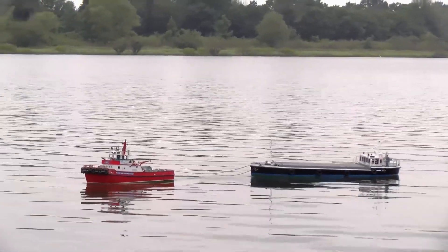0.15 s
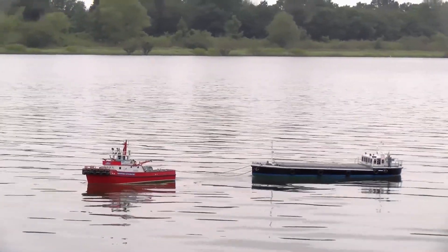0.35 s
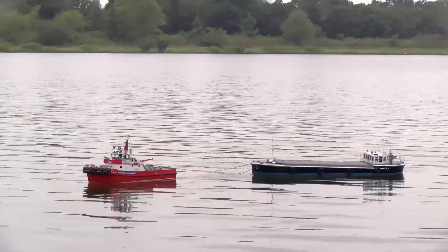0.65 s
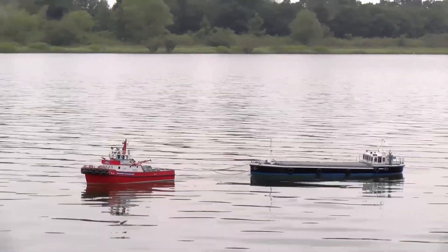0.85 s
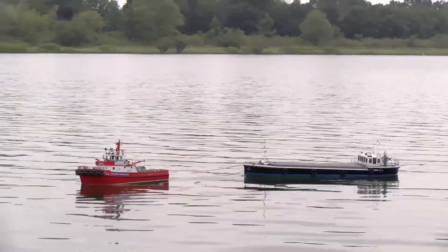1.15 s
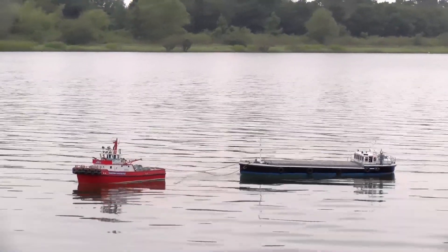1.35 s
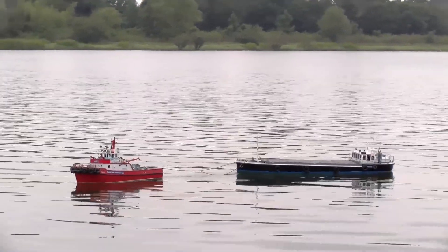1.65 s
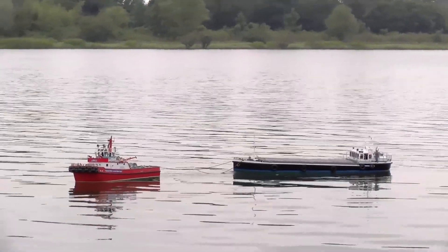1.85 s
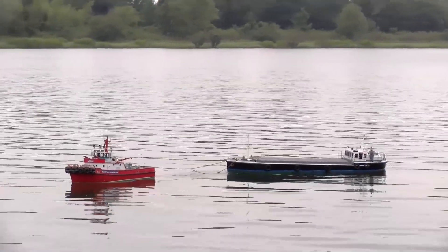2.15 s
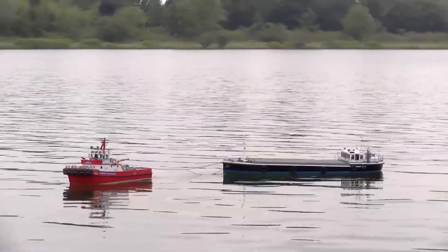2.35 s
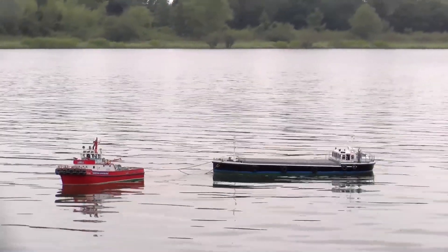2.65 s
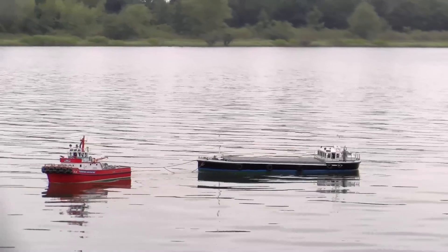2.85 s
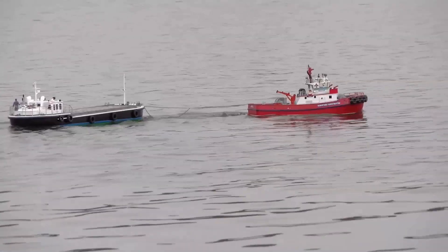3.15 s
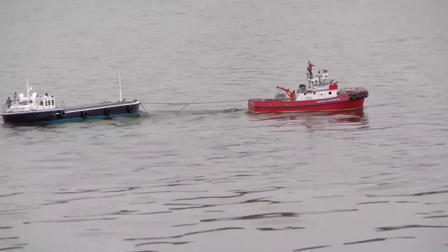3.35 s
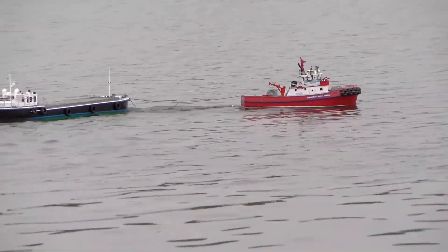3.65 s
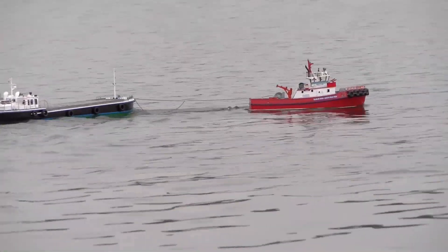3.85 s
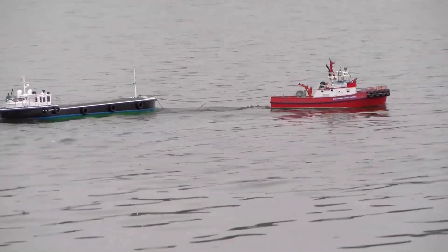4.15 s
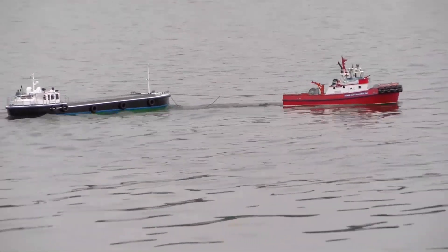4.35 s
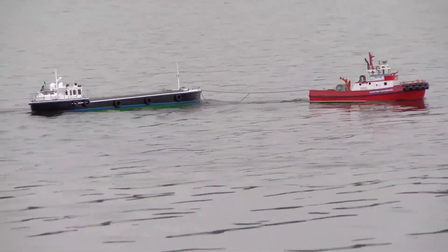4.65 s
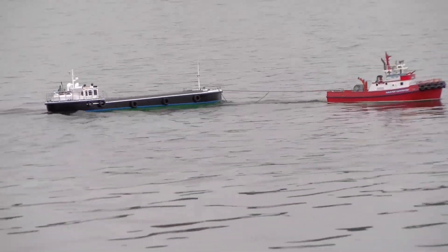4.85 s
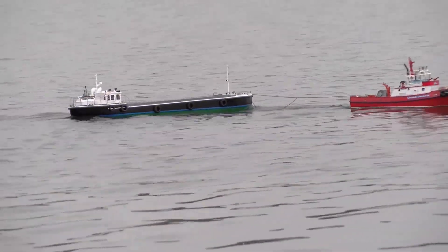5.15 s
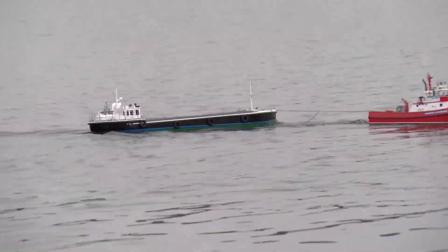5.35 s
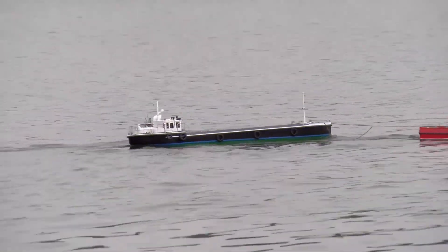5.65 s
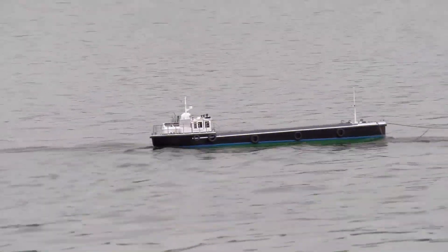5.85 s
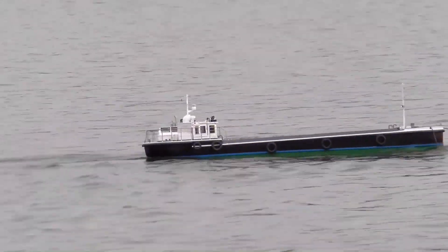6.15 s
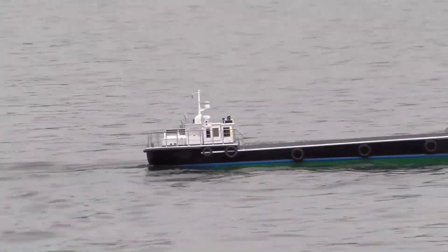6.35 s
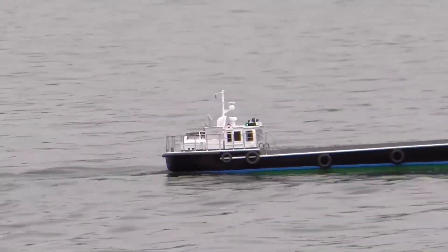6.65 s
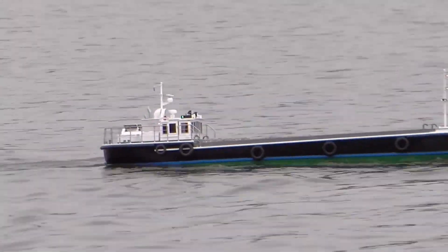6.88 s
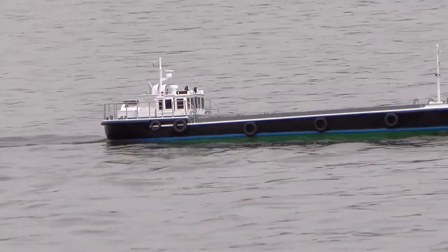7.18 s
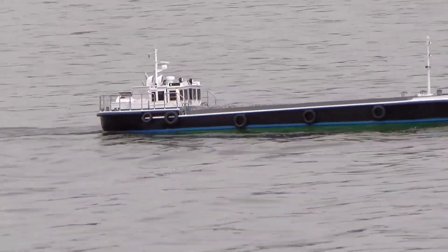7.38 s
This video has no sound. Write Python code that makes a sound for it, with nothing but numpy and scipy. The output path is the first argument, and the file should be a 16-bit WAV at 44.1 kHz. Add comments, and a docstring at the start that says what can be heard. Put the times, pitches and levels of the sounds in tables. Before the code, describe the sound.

On an open lake, a small model tug motor drones steadily with a bright, rattling buzz, close and leaning slightly right. Just after three seconds the sound cuts to a lower, much quieter, centred drone with rougher knocking. It drops out briefly twice, and near six seconds wind thumps the microphone among tiny dry ticks. A soft shore hush stays behind, and the pitch rises slightly at the very end.

```python
"""Model tug on a calm lake

A model tug drones close by on the right, then after a cut farther off and slower.
The drive is a sine hum with side tones; two knocks per shaft turn ring hull and panels through
resonances. The drone drops out now and then. Behind it: noise bursts as dry ticks, low rumble and
thumps as wind on the microphone, and drifting shaped noise as the hush of the lake shore."""
import sys
import numpy as np
from scipy import signal
from scipy.fft import rfft, irfft, next_fast_len
from scipy.io import wavfile
from scipy.ndimage import uniform_filter1d

SR = 44100
rng = np.random.default_rng(int(sys.argv[2]) if len(sys.argv) > 2 else 0)


def wav_out(sig):
    """Save sig, one row per channel (or a flat mono array), as 16-bit PCM at SR to the path in sys.argv[1]."""
    wavfile.write(sys.argv[1], SR, np.round(np.clip(np.atleast_2d(sig).T, -1, 1) * 32767).astype(np.int16))


def field_ratio(decibels):
    """Amplitude ratio for a level in dB (20 dB per decade); scalars and array-likes work."""
    return 10 ** (np.asarray(decibels, dtype=float) / 20)


N = 331632
CUT_S = 3.207

# Drive speed, heard as a hum at twelve times the rate of one round (three shaft turns): time_s, pitch_hz
HUM_NEAR = [(0, 250.0), (0.75, 248.0), (1.2, 249.3), (1.8, 249.1), (2.3, 247.2), (2.6, 248.4), (3.2, 249.5)]
HUM_FAR = [(3.22, 189.0), (4.1, 189.5), (4.35, 191.0), (4.9, 189.3), (6.5, 191.6), (7.13, 189.6),
           (7.31, 210.2), (7.4, 211.0), (7.52, 211.0)]
# Level at the starting speed, and its change as the throttle opens
HUM_NEAR_DB, HUM_FAR_DB, HUM_DB_PER_HZ = -22, -41.5, 0.2336
KNOCK_NEAR_DB, KNOCK_FAR_DB, KNOCK_DB_PER_HZ = -32.5, -39.5, -0.0274
# Clean tones beside the hum: multiple_of_round, level_db
ORDERS_NEAR = [(9, -48.5), (14, -49), (15, -51.5), (20.25, -47), (21, -52.5), (24, -42), (30, -37),
               (33, -46), (36, -38), (41, -53.5), (44.2, -40.5), (54, -40), (57.2, -42.5)]
# The same far off: multiple_of_round, level_db, gain_db_per_hum_hz as the throttle opens
ORDERS_FAR = [(14.04, -52, -0.19), (15.14, -48, 0.052), (17.94, -51.5, -0.21), (29.46, -55.5, 0.23),
              (36.1, -48.5, 0.41), (39.37, -51.5, -0.41), (41.45, -51, -0.52), (42.15, -55.5, -0.32),
              (54.3, -51, 0.044), (57, -48.5, 0.018), (59.1, -47.5, -0.0057), (63, -61.5, 0.73),
              (69.7, -51.5, -.1)]
# The six knocks of a round, relative to each other: level_db
PATTERN_NEAR_DB = [-4, -3, -5, -16.5, -3, -4.5]
PATTERN_FAR_DB = [-2, -2.5, 2, -0.5, -2.5, 1.5]
# Knocks with a boost or cut of their own: time_s, change_db
HARD_BLOWS = [(3.281, -8), (3.73, 5), (3.837, 3), (3.889, 8.5), (4.272, 6), (4.647, 5), (4.658, 4),
              (5.191, 5), (5.327, 4), (5.612, 10), (5.823, 2.5), (6.011, 5.5), (6.138, 3), (6.148, 5.5),
              (6.201, 4.5), (6.262, 1), (6.324, 3), (6.561, 7), (6.613, 6), (6.69, 7), (6.864, 5.5),
              (6.981, 7.5)]
# Resonances of the hull: centre_hz, width_hz, level_db
HULL = [(236.6, 30.4, -5), (449, 39, -8.5), (503, 70.2, -2), (618, 66.5, 1.7), (866, 79.8, 0.5),
        (1118, 97.3, 3), (1232, 104, -1), (1513, 314, -12.5), (2856, 380, -29.5), (4590, 610, -33.5),
        (8140, 135, -34.5), (9550, 480, -44.5)]
# Colour that distance and angle give the hull: frequency_hz, gain_db
PATH_NEAR = [(200, -3), (450, -4), (800, -1.45), (1200, -5.5), (1600, -1), (2200, 5.5), (3000, 5.5),
             (5000, 0), (9000, 3)]
PATH_FAR = [(200, 4.5), (450, -3), (800, -1), (1200, 0), (2000, -5), (2800, -14), (3600, 7), (5000, 4),
            (9000, -2)]
# Thin panels that sound up or fade as the boat turns: centre_hz, width_hz
PANELS = [(1126, 340), (1847, 580), (2394, 290), (2840, 170), (3370, 380), (3740, 140), (5470, 300),
          (7056, 360), (8890, 330), (8630, 270)]
# Slow swell of each panel as the boat moves, rows as in PANELS: mean_db, swing_db, crest_s, cycle_s
FACING_NEAR = [(-42, -0.5, 1.5, 2.3), (-43.5, -0.5, 2.9, 1.7), (-54.5, 4, 2.9, 5.5), (-60.5, 1.5, 3.2, 5),
               (-53, 0.5, 0.14, 3.5), (-55, 1.6, 1.05, 2.8), (-69, 5, 0.52, 6), (-64, 8, 3.9, 5.6),
               (-66, 1, 1.3, 2.5), (-67, 0, 1.1, 2.1)]
FACING_FAR = [(-43.5, 0.47, 5, 2.6), (-54, 1.1, 4.16, 3), (-65, 11.5, 3.7, 4.2), (-66.5, 2.6, 5.5, 3.7),
              (-58.5, 2.1, 5.76, 2.74), (-64.5, 4.8, 3.9, 4.3), (-66.5, 2.5, 6.9, 5.1),
              (-68.5, 2.6, 3.97, 2.6), (-74, 2.5, 2.78, 6.8), (-74, 4, 2.7, 7.2)]
# Slide of each panel's pitch as the boat turns, rows as in PANELS: swing_hz, highest_s, cycle_s
SLIDE_NEAR = [(30.2, 2.5, 1.1), (60, 3.5, 6.8), (41, 2.2, 6.2), (60.3, 3.7, 4.8), (80, 2.3, 2.5),
              (30, 0.31, 6.9), (90, 1.2, 1.5), (70, 1.2, 4.6), (40, 0.95, 5.5), (30, 0.63, 3.3)]
SLIDE_FAR = [(30, 6.64, 1.64), (60, 5.2, 2.1), (50, 3.4, 2.2), (50, 2.8, 8.6), (130, 3.36, 2.13),
             (110, 3.83, 1.32), (110, 6.7, 7.9), (110, 6.2, 3.7), (150, 4.9, 7.9), (30, 5, 2.2)]
# Blow against rattle in each panel, rows as in PANELS: ratio
PING_NEAR = [2.2, 5, 2.4, 2.4, 1.6, 1.4, 1.4, 1.2, 1, 1.1]
PING_FAR = [5, 2.4, 1.7, 2.4, 2.2, 1.5, 2.2, 1.6, 1.1, 1.3]
# Dropouts of the drone, and a brief fade as the scene changes at 3.2 s: start_s, hold_s, swell_back_s, depth_db
# (of the tones)
GAPS = [(0.04, .004, .018, -20), (0.547, .002, .003, -15), (2.116, .005, .02, -40),
        (3.204, .003, .004, -20), (3.3, .015, .02, -9), (3.54, .012, .015, -9), (4.508, .11, .008, -22),
        (5.497, .006, .01, -15), (5.543, .008, .012, -15), (6.468, .087, .004, -24),
        (7.175, .012, .015, -8)]
# Sideways placing of the near boat: frequency_hz, left_minus_right_db
LEAN = [(60, 0.0), (110, 0.0), (200, 0.0), (380, 0.0), (700, -1.0), (1290, -3.5), (2380, -2.5),
        (4400, -0.5), (8120, 0.0), (15000, 0.5)]
# Small dry ticks near the microphone: start_s, peak_db
TICKS = [(5.472, -44), (5.496, -36.5), (6.905, -41)]
# Gusts that swell the rumble: centre_s, level_db, length_s
GUSTS = [(0.12, -62, 0.097), (0.793, -58, 0.067), (1.554, -62, 0.055), (5.664, -47, 0.12),
         (7.063, -56, 0.13), (7.215, -58, 0.053)]
# Puffs that thump the microphone membrane: centre_s, level_db, pitch_hz, length_s
PUFFS = [(5.628, -42, 88, 0.047), (5.692, -39, 80, 0.029), (5.717, -27, 88.5, 0.046)]
# Spectrum of the shore hush, relative: frequency_hz, density_db_per_hz
SHORE = [(30, -46.5), (96, -24.5), (250, -0.5), (460, -0.5), (710, -7), (930, 0.5), (1600, -15.5),
         (2200, -20), (2660, -31), (3150, -22.5), (3700, -25.5), (4300, -21.5), (5200, -26.5), (6200, -36),
         (7500, -39.5), (9000, -37.5), (11000, -41), (15700, -43)]
# Narrow dips of the microphone housing: centre_hz, width_hz, gain_db
DIPS = [(2634, 71, -10.5), (4270, 390, -4)]
# Mark for left-right difference against the whole; below it a band folds to mono: frequency_hz, mark_db
# Second entry: random jump of the mark, jump_db
MERGE, MERGE_JUMP_DB = [(200, -31), (700, -25), (2000, -21.5), (3500, -14), (5500, -8), (9000, -7.5),
                        (15000, -5)], 5


def evened(x):
    """Scales to rms 1."""
    return x / np.sqrt(np.mean(x ** 2) + 1e-20)


def read(points, hz):
    """Reads a spectrum table, joined on a log-frequency axis."""
    f, value = np.transpose(points)
    return np.interp(np.log(hz + 1), np.log(f + 1), value)


def colour(x, response):
    """Filters x by a function of frequency."""
    size = next_fast_len(x.shape[-1] + SR // 4)
    spectrum = rfft(x, size) * response(np.fft.rfftfreq(size, 1 / SR))
    return irfft(spectrum, size)[..., :x.shape[-1]]


def wander(t, low_hz, high_hz):
    """Slow chance: nine sines of random phase, rms 1."""
    rates_hz = np.geomspace(low_hz, high_hz, num=9)
    return evened(sum(np.sin(2 * np.pi * (f * t + rng.random())) for f in rates_hz))


def mode(hz, f, width):
    """One damped resonance, gain 1 at its centre."""
    return 1j * hz * width / (f ** 2 - hz ** 2 + 1j * hz * width)


def resonate(x, hz, width):
    """A resonance that follows the curve hz: shift down to zero, smooth twice, shift back."""
    turn = np.exp(2j * np.pi * np.cumsum(hz) / SR)
    r = np.exp(-np.pi * width / SR)
    return (turn * signal.lfilter([1], [1, -2 * r, r * r], x / turn)).real


def drive(t, hum, hum_db, orders, knock_db, path, facing, slide, throb_db, loose, waver, pings, linger,
          **blow):
    """One drive turns out hum and side tones, and its knocks ring the hull and the panels."""
    s, hz = np.transpose(hum)
    speed_hz = np.interp(t, s, hz)
    rise_hz = speed_hz - hz[0]
    rounds = np.cumsum(speed_hz * (1 + 0.0043 * wander(t, 6, 30))) / 12 / SR
    tones = hum_tone(t, rounds, rise_hz, hum_db, throb_db)
    tones += side_tones(t, rounds, rise_hz, orders, loose, waver)
    played = rounds + .01 * wander(t, 20, 90)  # play in the coupling shifts each knock
    luck = blow_luck(len(t))  # felt by hull and panels alike
    blow["hard_db"] = hard_blows(t, played)
    gap = gaps(t)
    ring = hull_ring(knocks(played, luck, **blow), path)
    ring *= field_ratio(knock_db + KNOCK_DB_PER_HZ * rise_hz)
    out = tones * gap + ring * gap ** 0.25  # the hull drops out less deeply than the tones
    return out + panels(t, played, luck, gap, facing, slide, pings, linger, blow)


def hum_tone(t, rounds, rise_hz, hum_db, throb_db):
    """A throbbing sine at twelve cycles a round, louder as the throttle opens."""
    level_db = hum_db + HUM_DB_PER_HZ * rise_hz + throb_db * wander(t, 4, 12)
    return np.sqrt(2) * field_ratio(level_db) * np.sin(2 * np.pi * 12 * rounds)


def side_tones(t, rounds, rise_hz, orders, loose, waver):
    """Tones tied to the rounds; loose spreads their starting phase, waver shakes their phase."""
    out = np.zeros(len(t))
    for k, tone_db, *db_per_hz in orders:
        level_db = tone_db + sum(db_per_hz) * rise_hz + 0.39 * wander(t, 2.7, 15)
        cycles = k * (rounds + waver * wander(t, 1.5, 12)) + loose * rng.random()
        out += np.sqrt(2) * field_ratio(level_db) * np.cos(2 * np.pi * cycles)
    return out


def blow_luck(count):
    """Chance in how hard each blow lands, part raw and part smoothed over three neighbouring blows."""
    luck = rng.exponential(1, count).clip(0, 2.4) - 1
    return 0.37 * luck + 0.65 * uniform_filter1d(luck, size=3)  # hard blows come in short runs


def hard_blows(t, played):
    """Level change in dB within half a knock period of each listed blow."""
    out = np.zeros(len(t))
    for at, change_db in HARD_BLOWS:
        centre = np.interp(at, t, played, -9, -9)  # -9 leaves out blows outside this pass
        out += change_db * (abs(played - centre) < 1 / 12)
    return out


def knocks(rounds, luck, pattern_db, hard_db, scatter_db, sharp, rattle, tail):
    """Six blows a round, each of its own size, over steady rattle and tails in knock periods."""
    own_share = 0.7  # how much of a blow's size each ringing part decides for itself
    count = 6 * rounds
    which = np.maximum.accumulate(count.astype(int).clip(0))
    own = rng.uniform(-0.99, 1, len(rounds))
    chance = ((2.0 - own_share) * luck + own_share * own)[which]
    size = field_ratio(np.array(pattern_db)[which % 6] + scatter_db * chance + hard_db)
    blows = size * np.diff(which, prepend=0)
    shakes = (rattle + size * np.exp(-(count % 1) / tail)) * rng.standard_normal(len(rounds))
    return evened(sharp * evened(blows) + evened(shakes))


def hull(hz):
    """Resonances of alternating sign, so that valleys between them stay partly filled."""
    return sum((-1) ** k * field_ratio(db) * mode(hz, f, w) for k, (f, w, db) in enumerate(HULL))


def hull_ring(struck, path):
    """The knocks ring the hull modes, coloured by distance and angle, at rms 1."""
    return evened(colour(struck, lambda f: hull(f) * field_ratio(read(path, f))))


def panels(t, played, luck, gap, facing, slide, pings, linger, blow):
    """Thin panels ring on sliding resonances; linger is the power of the dropout gain they follow."""
    out = np.zeros(len(t))
    for (f0, width), ping, face, (swing_hz, highest, turn) in zip(PANELS, pings, facing, slide):
        mean_db, swing_db, crest, cycle = face
        level_db = mean_db + swing_db * np.cos(2 * np.pi * (t - crest) / cycle)
        level_db += 1.76 * wander(t, 5, 22)  # random fast flutter in level
        pitch_hz = f0 + swing_hz * np.cos(2 * np.pi * (t - highest) / turn)
        struck = knocks(played, luck, **{**blow, "sharp": ping})
        depth = linger if f0 < 3600 else 0.15 * linger  # high panels rattle on through a dropout
        out += gap ** depth * field_ratio(level_db) * evened(resonate(struck, pitch_hz, width))
    return out


def gaps(t):
    """Dropout gain: a sudden drop, a short hold at lower level, a swell back."""
    gain = np.ones(len(t))
    for s, hold, back, db in GAPS:
        times = [s - 8 / SR, s, s + hold, s + hold + back]
        gain *= np.interp(t, times, [1, field_ratio(db), field_ratio(db), 1])
    return gain


def near_boat(t):
    """The close pass, leaning right, with a faint 4 ms echo, opposite in the two sides."""
    close = drive(t, HUM_NEAR, HUM_NEAR_DB, ORDERS_NEAR, KNOCK_NEAR_DB, PATH_NEAR, FACING_NEAR,
                  SLIDE_NEAR, throb_db=0.38, loose=0.98, waver=0.0024, pings=PING_NEAR, linger=0.057,
                  pattern_db=PATTERN_NEAR_DB, scatter_db=3.0, sharp=0.7, rattle=0.8, tail=0.5)
    echo = colour(close, lambda f: field_ratio(-11) * mode(f, 7000, 16000) ** 2 * np.exp(-2j * np.pi * f * .004))
    sides = colour(close, lambda f: field_ratio(np.outer([.5, -.5], read(LEAN, f))))
    return sides + np.outer([1, -1], echo)


def far_boat(t):
    """The distant, slower pass, alike on both sides."""
    distant = drive(t, HUM_FAR, HUM_FAR_DB, ORDERS_FAR, KNOCK_FAR_DB, PATH_FAR, FACING_FAR,
                    SLIDE_FAR, throb_db=1.16, loose=0.12, waver=0.0015, pings=PING_FAR, linger=1.0,
                    pattern_db=PATTERN_FAR_DB, scatter_db=3.0, sharp=0.75, rattle=0.58, tail=0.3)
    return np.array([distant, distant])


def ticks(t):
    """Very short bursts of noise that die at once."""
    decay_s = 0.00041
    burst = rng.choice([-1., 1.], N)
    return burst * sum(field_ratio(db) * (t >= s) * np.exp(-abs(t - s) / decay_s) for s, db in TICKS)


def wind(t):
    """Lumpy low rumble that swells in gusts, and a few single thumps; the two sides differ a little."""
    def low_hump(f):
        return f ** 3 / (85 ** 2 - f ** 2 + 1j * f * 50) / (1 + (f / 120) ** 5)

    middle, side = evened(colour(rng.standard_normal((2, N)), low_hump))
    level = field_ratio(np.where(t < CUT_S, -65, -59) + 1.5 * wander(t, 1.5, 18.0))
    for s, db, length in GUSTS:
        level += field_ratio(db) * np.exp(-((t - s) / length) ** 2)
    side = side * field_ratio(np.where(t < CUT_S, -20, -26))
    out = (middle + np.outer([1, -1], side)) * level
    for s, db, hz, length in PUFFS:
        bell = np.exp(-8 * ((t - s) / length) ** 2)
        out += field_ratio(db) * bell * np.sin(2 * np.pi * hz * (t - s))
    return out


def shore(t):
    """Distant hush: shaped noise in drifting patches, nearly alike on both sides."""
    frames, hz = N // 256 + 5, np.fft.rfftfreq(1024, 1 / SR)
    a, b, c, d, patches = rng.standard_normal((frames, 513, 5)).T
    patches = evened(uniform_filter1d(uniform_filter1d(patches, 10, 0), 12, 1))
    apart = 0.016 + 0.81 * (hz[:, None] / 15000) ** 1.33  # the sides differ more in the treble
    z = (a + 1j * b) + np.array([1, -1])[:, None, None] * apart * (c + 1j * d)
    z *= field_ratio(read(SHORE, hz)[:, None] + 1.38 * patches)
    hush = evened(signal.istft(z, nperseg=1024, noverlap=768)[1][:, :N])
    return hush * field_ratio(np.where(t < CUT_S, -41, -40))


def scene():
    """Near pass, cut, far pass, over ticks, wind and shore."""
    t = np.arange(N) / SR
    boat = np.hstack([near_boat(t[t < CUT_S]), far_boat(t[t >= CUT_S])])
    return boat + ticks(t) + wind(t) + shore(t)


def housing(z, hz):
    """Narrow dips that the microphone housing cuts into the spectrum."""
    dip_db = sum(db / (1 + (2 * (hz - f) / width) ** 2) for f, width, db in DIPS)
    return z * field_ratio(dip_db)[:, None]


def band_sums(power, width):
    """Sums power over bands of so many bins, spread back over the bins."""
    return np.repeat(power[:512].reshape(512 // width, width, -1).sum(1), width, axis=0)


def treble_gate(power, hz):
    """Gain that mutes bands above 4500 Hz lying far under the whole sound."""
    bands = uniform_filter1d(band_sums(power, 8), size=2, axis=1)
    whole = uniform_filter1d(power.sum(0), size=8)
    under_db = 10 * np.log10(bands / whole + 1e-14)
    return np.where(hz[:512, None] > 4500, np.clip((under_db + 49.0) / 3, .001, 1), 1)


def side_to_remove(z, power, hz):
    """The left-right difference of nearly mono bands, chosen by a mark that jumps at random."""
    side = (z[0] - z[1])[:512] / 2
    apart = uniform_filter1d(band_sums(abs(side) ** 2, 4), size=2, axis=1)
    whole = uniform_filter1d(band_sums(power, 4) + 1e-20, size=2, axis=1)
    side_db = 10 * np.log10(apart / whole + 1e-14)
    frames = side.shape[1]
    jumps = np.kron(rng.standard_normal((frames // 4 + 1, 64)).T, np.ones((8, 4)))[:, :frames]
    mark_db = read(MERGE, hz[:512, None]) + MERGE_JUMP_DB * jumps
    return np.array([1, -1])[:, None, None] * side * np.clip(mark_db - side_db, 0, 1)


def top_cut(x):
    """Nothing passes above the cut-off."""
    return signal.sosfilt(signal.butter(12, 15810, fs=SR, output="sos"), x)


def record(dry):
    """The housing colours the sound; nearly mono bands fold to mono and faint treble is muted."""
    hz, _, z = signal.stft(dry, SR, nperseg=1024)
    z = housing(z, hz)
    power = (abs(z) ** 2).mean(0)
    z[:, :512] -= side_to_remove(z, power, hz)
    z[:, :512] *= treble_gate(power, hz)
    mix = signal.istft(z, SR, nperseg=1024)[1][:, :N]
    return top_cut(mix)


dry = scene()
out = record(dry)
wav_out(out)
```